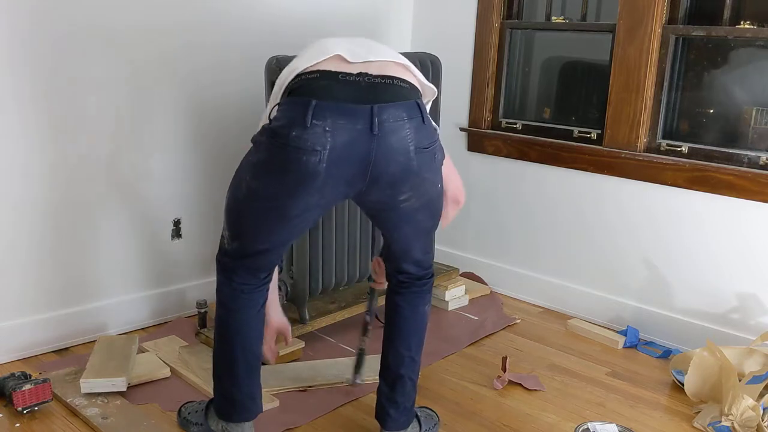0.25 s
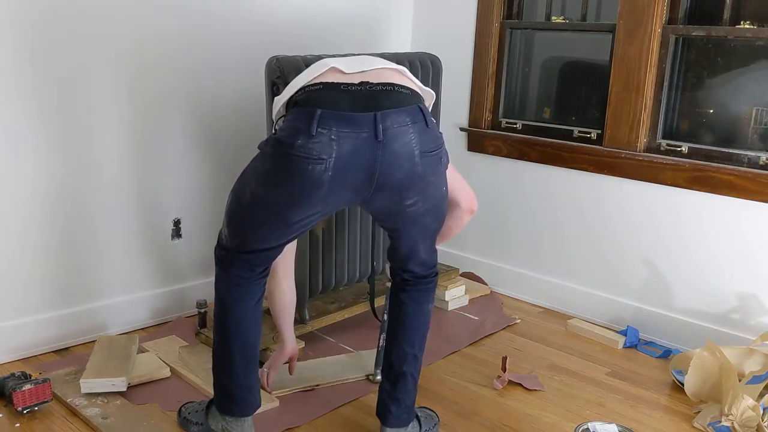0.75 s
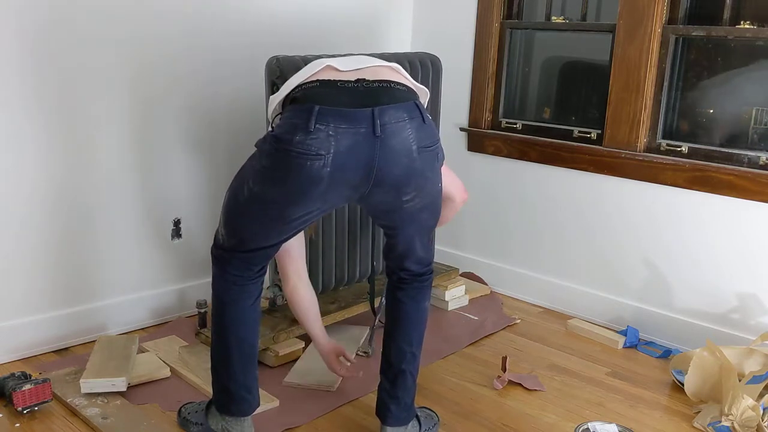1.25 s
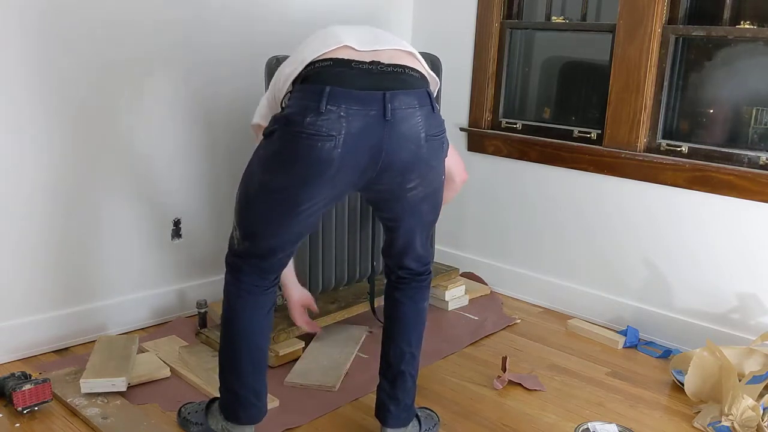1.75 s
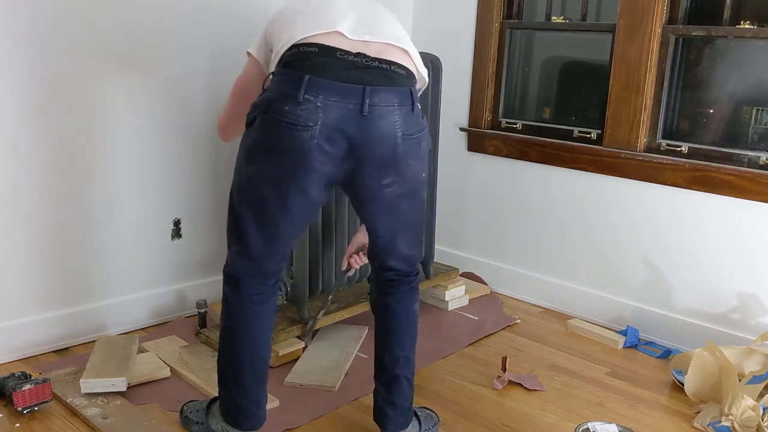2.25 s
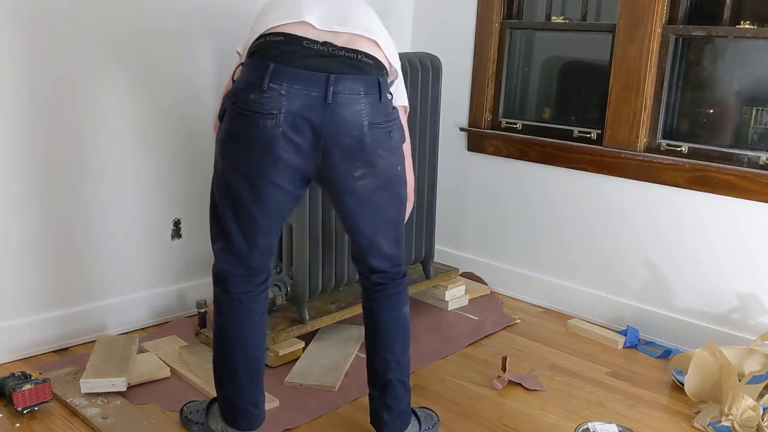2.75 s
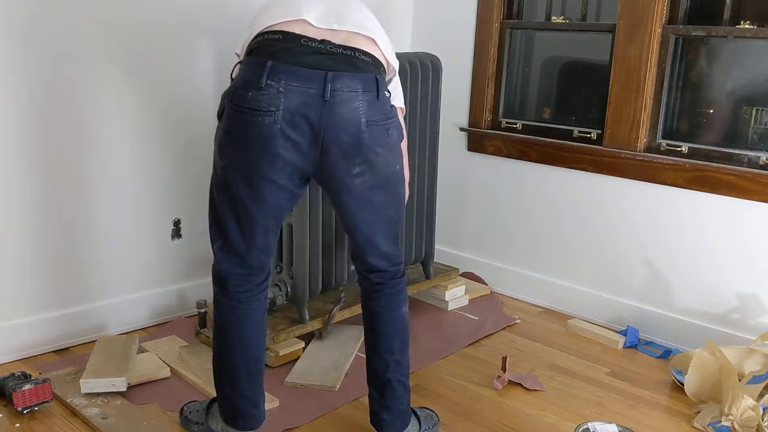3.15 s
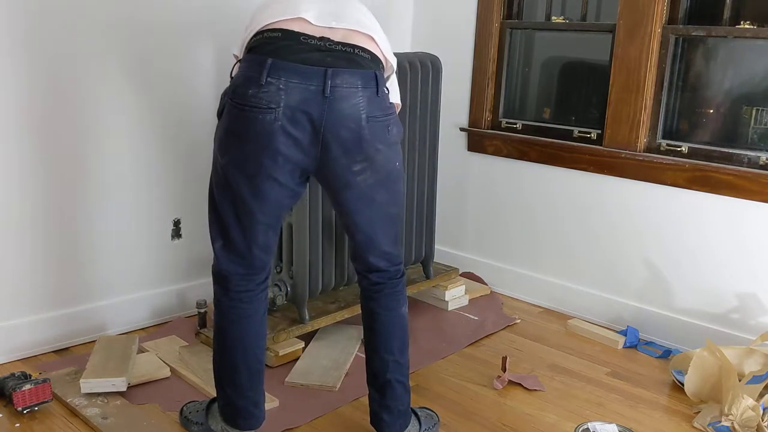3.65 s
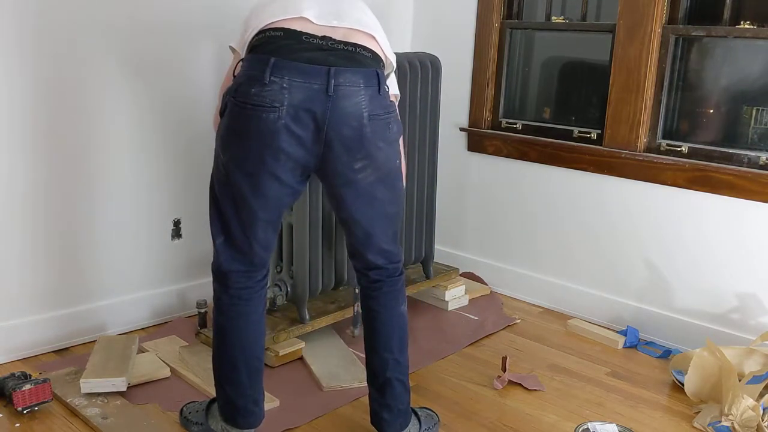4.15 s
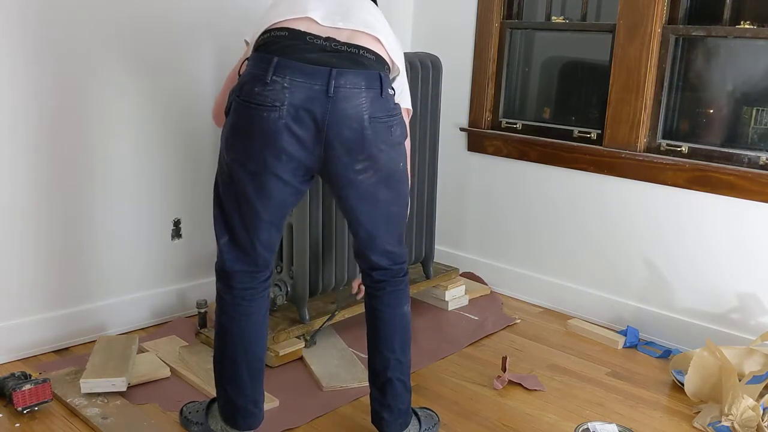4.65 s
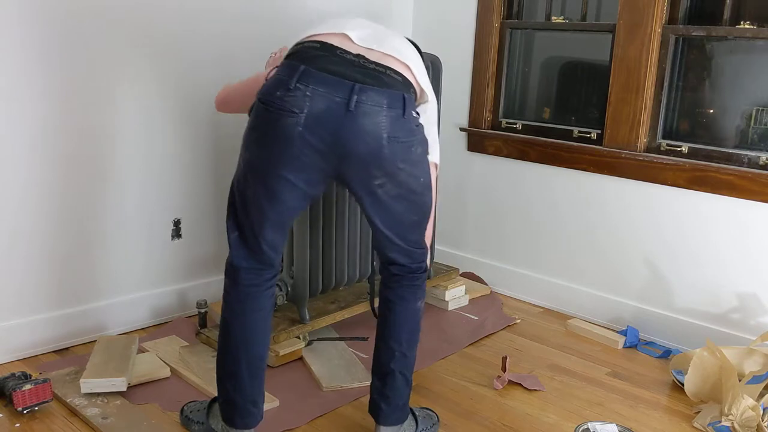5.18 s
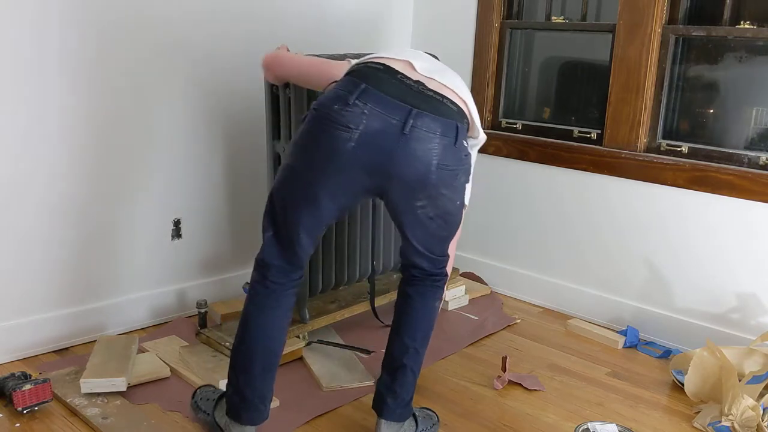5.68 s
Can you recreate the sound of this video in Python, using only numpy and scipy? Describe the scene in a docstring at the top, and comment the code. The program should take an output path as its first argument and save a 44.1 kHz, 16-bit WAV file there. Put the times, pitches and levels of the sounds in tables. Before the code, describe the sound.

In a small bare room, a tight burst of loud hollow wood knocks with a ringing steel clink and low floor boom opens the action. Boards hiss over papered floor, then more knocks cluster. After a pause come further clunks, gritty scraping, another bright slide and a short dry rip. The end is quieter with light scrapes. Stereo microphone at a few metres, work slightly right, faint hum beneath.

```python
"""Levering boards from under a radiator

Boards and blocks are levered out from under a cast-iron radiator with a steel pry bar, in a bare room.
Wood knocks ring through board resonances, joists boom as two beating modes, and the bar clinks as decaying
modes. Boards slide hissing and grinding over the papered floor as trains of tiny catches, and dry rips are
trains of cracks. Filtered noise and a low wavering hum lie beneath."""
import sys
import numpy as np
from scipy import signal
from scipy.fft import rfft, irfft, next_fast_len
from scipy.io import wavfile
from scipy.ndimage import map_coordinates

SR = 44100
rng = np.random.default_rng(int(sys.argv[2]) if len(sys.argv) > 2 else 0)


def file_out(sig):
    """Save sig as 16-bit WAV at sys.argv[1]."""
    # one column per channel
    cols = np.atleast_2d(sig).T
    # limit, then scale
    lim = np.clip(cols, -1, 1)
    pcm = np.round(lim * 32767).astype(np.int16)
    wavfile.write(sys.argv[1], SR, pcm)


N = 261072  # length [samples]
TIME = np.arange(N) / SR  # [s]
LIFE = np.arange(int(1.4 * SR)) / SR  # time since an event began [s]

# Still air of the room: frequency_hz, density_db (relative, per Hz)
AIR_SPECTRUM = [(20, -35), (32, -33), (48, -1.5), (80, 1.5), (110, -16.5), (200, -14.5), (330, -28),
                (520, -25), (1000, -29.5), (1800, -33.5), (2400, -29.5), (3500, -33), (8000, -41),
                (15800, -43.5)]
# Hum of a distant machine: frequency_hz, level_db (about which it wavers)
HUM_TONES = [(80.7, -68.5), (129.2, -71.5), (296, -73)]
# Boards pushed or dragged: top_speed_s, speeding_up_s, slowing_down_s, face_hiss_db, edge_grind_db
STROKES = [(.005, 0.011, 0.084, -62, -44), (.28, 0.21, .2, -66, -59), (.66, .05, 0.19, -45.5, -54),
           (.905, 0.13, 0.099, -29.5, -51), (1.16, 0.14, 0.12, -33, -46), (1.23, 0.089, 0.1, -32.5, -72),
           (1.37, 0.15, 0.23, -46.5, -58), (2.135, .07, 0.049, -60.5, -72),
           (2.785, 0.032, 0.087, -46.5, -33), (3.02, 0.041, 0.088, -47, -37),
           (3.155, 0.095, 0.073, -50, -42.5), (3.73, 0.043, 0.29, -48.5, -64),
           (3.919, .11, 0.14, -30.5, -62), (4.055, 0.069, 0.093, -32.5, -37), (4.72, .04, 0.22, -70, -45.5),
           (5.22, 0.42, 0.16, -62.5, -61), (5.645, 0.042, 0.11, -48.5, -48.5),
           (5.89, 0.041, 0.038, -40, -47)]
# Hiss of a board's face: frequency_hz, density_db (relative, per Hz)
HISS_SPECTRUM = [(100, -15), (300, -1), (450, -10.5), (800, -6), (1200, -2), (1900, -4.5), (2600, -0.5),
                 (4000, -1), (7000, -3), (10000, -4.5), (15800, -10.5)]
# Grind of a board's loaded edge: frequency_hz, density_db (relative, per Hz)
GRIND_SPECTRUM = [(80, 1), (250, 6.5), (600, -2), (1100, -2), (1700, -10.5), (2600, -11), (5000, -19),
                  (9000, -26.5), (15000, -49)]
# Wooden blows: start_s, body_db, body_hz, clack_db, clack_hz, splintery_tick_db, seating_s
KNOCKS = [(.475, -14, 240, -23.5, 1190, -44, 0.00077), (.518, -19, 215, -27, 640, -45, 0.009),
          (.581, -30.5, 342, -21, 1206, -34.5, 0.0049), (0.755, -46, 201, -41, 1190, -68, .002),
          (1.082, -19, 284, -26, 447, -61.5, 0.0056), (1.144, -22, 320, -20.5, 1160, -36, 0.0017),
          (1.218, -16.5, 226, -22.5, 695, -51.5, 0.001), (2.29, -22.5, 368, -27, 713, -53, 0.0058),
          (2.431, -25.5, 311, -22, 923, -67, 0.0031), (2.757, -41, 312, -42, 1050, -57, 0.0032),
          (2.779, -38, 287, -34, 910, -53, 0.0032), (2.964, -19.5, 254, -29.5, 320, -50.5, 0.0042),
          (3.253, -19.5, 283, -26, 710, -41, 0.0037), (3.322, -26, 480, -26.5, 880, -48.5, 0.00027),
          (3.729, -25, 258, -41, 660, -50.5, 0.0027), (3.764, -31, 172, -35, 1000, -65, 0.00095),
          (4.098, -22.5, 267, -25, 840, -69, 0.0043), (4.444, -90, 297, -56.5, 1840, -79, 0.0086),
          (4.695, -28.5, 301, -28.5, 607, -75, 0.002)]
# Resonances of the stacked boards: frequency_hz, width_hz, gain_db (relative to the direct path)
BOARD_MODES = [(115, 16, 8), (156, 28.5, 10), (220.4, 8.9, 5.5), (273.4, 46, 4.5), (380, 22, 4),
               (494, 91, 10.5), (611, 63, 5), (760, 18, -6), (734, 39, -1), (921, 69, 3.5), (1210, 12, -5),
               (1340, 62, 0.5), (1890, 48, 3.5), (2414, 155, 8.5), (2670, 330, 6)]
# Tick of splintering fibres: frequency_hz, gain_db
TICK_SPECTRUM = [(200, -65.5), (600, -24), (2000, 4.5), (4500, -8.5), (8000, -7.5), (15000, -16)]
# Blows on the pry bar: start_s, ring_db, clatter_db, contact_favoured_hz, extra_ping_db
CLINKS = [(0.479, -36.5, -32, 4000, 1), (.580, -25.5, -30, 3230, 4.5), (.755, -36, -56, 1380, 14),
          (2.294, -48, -51.5, 6000, -19), (2.429, -46, -33, 2130, -9), (3.254, -41, -43.5, 3430, -6),
          (3.321, -59, -41.5, 1730, -6), (4.098, -53, -42, 1730, -6), (4.699, -46, -43.5, 1900, 6)]
# Modes of the steel bar: frequency_hz, level_db (relative), t60_s
STEEL_MODES = [(1211, 2, .45), (1351, -2, .6), (1593, 3, .3), (1830, -5, .4), (2514, -9, .4),
               (2775, -7, .45), (3149, -16, .5), (3495, -10, .4), (3987, 0, .55), (4440, -15, .2),
               (5728, -10, .45)]
# Weight landing on the joists: start_s, level_db (before the floor's low cut)
THUDS = [(0.492, -18.5), (1.112, -27.5), (1.238, -24), (2.449, -29.5), (2.966, -27.5), (3.288, -38.5),
         (3.738, -29), (3.795, -39), (4.103, -28.5), (4.703, -33)]
# Something stuck tears free: start_s, level_db, tearing_t60_s
SNAPS = [(4.588, -33, 0.12), (5.409, -62.5, 0.016)]
# Resonances that a rip excites: frequency_hz, width_hz, gain_db
SNAP_MODES = [(686, 30, 4), (1020, 70, -2.5), (1350, 97, -2.5), (1540, 35, 3.5), (1900, 190, -2.5),
              (2500, 98, 5.5), (2880, 540, -4), (5650, 690, -2.5), (7030, 790, 1), (9100, 620, 0.5),
              (13500, 1200, -3.5)]
# Reverberation of the room: frequency_hz, t60_s
ROOM_DECAY = [(60, 0.6), (160, 0.33), (420, 0.5), (1100, 0.52), (3000, 0.45), (8000, 0.34), (15000, 0.17)]
# Likeness of the two channels in a diffuse field: frequency_hz, correlation
CHANNEL_CORRELATION = [(50, .97), (130, .68), (300, .48), (550, .65), (1000, .25), (2000, -.05), (15000, 0)]
# Balance of the whole scene: frequency_hz, left_minus_right_db
BALANCE = [(60, -3.8), (130, -3.6), (280, -2), (4000, -1.6), (8000, .8), (12500, -3.5)]


def amp(db):
    """The decibel law: level to amplitude gain."""
    return 10 ** (np.asarray(db) / 20)


def unit(x):
    """Normalization of power: scale to rms 1."""
    return x / np.sqrt(np.mean(x ** 2) + 1e-20)


def along(points, hz):
    """Interpolation of (frequency, value) points on a logarithmic axis."""
    frequencies, values = np.transpose(points)
    return np.interp(np.log(hz + 1), np.log(frequencies), values)


def wobble(rate_hz):
    """Slow random modulation: a smooth curve through rate_hz normal knots a second."""
    knots = rng.standard_normal(int(N * rate_hz / SR) + 4)
    return map_coordinates(knots, [TIME * rate_hz])


def filtered(x, response):
    """Linear filtering: a spectrum multiplied by a complex response of frequency."""
    n = x.shape[-1]
    padded = next_fast_len(n + 8192)
    hz = np.fft.rfftfreq(padded, 1 / SR)
    return irfft(rfft(x, padded) * response(hz), padded)[..., :n]


def coloured(x, spectrum):
    """Spectral shaping: a gain in dB that varies with frequency."""
    return filtered(x, lambda hz: amp(along(spectrum, hz)))


def resonance(f, centre_hz, width_hz):
    """Damped oscillator: one causal resonance with peak gain 1."""
    return 1j * f * width_hz / (centre_hz ** 2 - f * f + 1j * f * width_hz)


def diffuse(x):
    """Spatial coherence: mixing two unrelated signals into a pair that is alike in the bass."""
    def mid_side_gains(hz):
        angle = np.arccos(np.clip(along(CHANNEL_CORRELATION, hz), -1, 1)) / 2
        return np.array([np.cos(angle), np.sin(angle)])

    mid, side = filtered(x, mid_side_gains)
    return np.array([mid + side, mid - side])


def room(early_db, rise_s=0.0017, late_db=-24, late_t60_s=2.16):
    """Reverberation: a fresh path with an early cluster, dense wall echoes and a faint lingering tail."""
    hz, t, cells = signal.stft(rng.standard_normal((2, len(LIFE))), SR, nperseg=256)
    t60 = along(ROOM_DECAY, hz)[:, None]
    main_decay = amp(-60 * t / t60)
    late_decay = amp(late_db - 60 * t / late_t60_s) * (t60 / t60.max()) ** 2
    echoes = signal.istft(cells * (main_decay + late_decay), SR, nperseg=256)[1]
    path = diffuse(echoes[:, :len(LIFE)])
    # the corner's walls and floor throw back a strong first cluster
    early_boost = 1 + amp(early_db) * np.exp(-LIFE / 0.0042)
    path *= early_boost * (1 - np.exp(-LIFE / rise_s))
    return path / np.linalg.norm(path, axis=1, keepdims=True)


def blow(x, db):
    """Level of a transient: its rms over the first 60 ms is set to db."""
    head = x[..., :int(.06 * SR)]
    return amp(db) * x / np.sqrt(np.mean(head ** 2) + 1e-20)


def add(track, start_s, x):
    """Superposition: x is summed into the track from start_s."""
    part = track[:, max(round(start_s * SR), 0):][:, :x.shape[-1]]
    part += x[..., :part.shape[1]]


def room_tone(air_db=-54):
    """Stationary background: diffuse coloured noise plus tones wavering in level and phase."""
    air = amp(air_db) * unit(coloured(diffuse(rng.standard_normal((2, N))), AIR_SPECTRUM))
    hum = 0
    for hz, db in HUM_TONES:
        level = amp(db + 7.3 * wobble(2.56))
        hum = hum + level * np.sqrt(2) * np.sin(2 * np.pi * hz * TIME + .5 * wobble(3.9))
    return air + hum


def pushes(ramp_db=22.5, turn_share=0.25, resting_hiss_db=-69, resting_grind_db=-72.5):
    """Addition of powers: strokes swell and fade steadily in dB, rounded at top speed, to drive hiss and grind."""
    # the loaded stack never lies quite still
    hiss_power = np.full(N, amp(resting_hiss_db) ** 2)
    grind_power = np.full(N, amp(resting_grind_db) ** 2)
    for top_s, rise_s, fall_s, hiss_db, grind_db in STROKES:
        ramps_away = (TIME - top_s) / np.where(TIME < top_s, rise_s, fall_s)
        # the turn at top speed is rounded over turn_share of a ramp
        rounded = np.hypot(ramps_away, turn_share) - turn_share
        push = amp(-ramp_db * np.minimum(rounded, 10))
        hiss_power = hiss_power + (amp(hiss_db) * push) ** 2
        grind_power = grind_power + (amp(grind_db) * push) ** 2
    return np.sqrt(hiss_power), np.sqrt(grind_power)


def friction(gain, spectrum, catches_per_s, uneven_db, echo_db):
    """Stick-slip friction: tiny catches of the grain under an uneven push, scattered and echoed by the room."""
    caught = rng.random((2, N)) < catches_per_s / SR
    grains = rng.standard_normal((2, N)) * caught
    stroke = unit(coloured(diffuse(grains), spectrum)) * gain * amp(uneven_db * wobble(35))
    echo = signal.fftconvolve(stroke, room(early_db=-17), axes=1)[:, :N]
    return (stroke + amp(echo_db) * echo) / np.hypot(1, amp(echo_db))


def knocks(body_q=1.11, clack_q=1.37, chatter_db=-26, chatter_t60_s=0.076, own_q=36):
    """Impact excitation of modes: a board's body, a harder clack where faces meet, and a tick of fibres."""
    def stack(f):
        return 1 + sum(amp(db) * resonance(f, hz, width) for hz, width, db in BOARD_MODES)

    out = np.zeros((2, N))
    t = LIFE[:SR // 10]
    for start_s, body_db, body_hz, clack_db, clack_hz, tick_db, seating_s in KNOCKS:
        # uneven faces chatter briefly before they lie flat
        chatter = rng.standard_normal(len(t)) * (rng.random(len(t)) < .1)
        force = amp(chatter_db - 60 * t / chatter_t60_s) * chatter
        force[0] = 1
        contact = signal.fftconvolve(room(early_db=0.5, rise_s=seating_s), force[None], axes=1)
        # every offcut adds a few bending modes of its own to those of the stack
        own_hz = np.geomspace(600, 4500, 9) * np.exp(.1 * rng.standard_normal(9))
        wood = filtered(contact, lambda f: stack(f) + 2 * sum(resonance(f, hz, hz / own_q) for hz in own_hz))
        body = filtered(wood, lambda f: resonance(f, body_hz, body_hz / body_q) ** 2)
        clack = filtered(wood, lambda f: resonance(f, clack_hz, clack_hz / clack_q) ** 2)
        tick = coloured(contact, TICK_SPECTRUM)
        add(out, start_s, blow(body, body_db) + blow(clack, clack_db) + blow(tick, tick_db))
    return out


def clinks(focus_db_per_octave=14, smear_hz=70, clatter_q=1.57, ping_hz=3987):
    """Modal ringing: the bar's tip clatters and its modes decay, fluttering under crossing wall echoes."""
    out = np.zeros((2, N))
    for start_s, ring_db, clatter_db, favoured_hz, ping_db in CLINKS:
        ring = 0
        for hz, mode_db, t60_s in STEEL_MODES:
            noise = rng.standard_normal((2, len(LIFE)))
            echoes = unit(filtered(noise, lambda f: resonance(f, hz, smear_hz) ** 2))
            tone = np.sin(2 * np.pi * (hz * LIFE + rng.random((2, 1)))) + .5 * echoes
            # modes far from the contact point's favoured frequency are excited less
            focus_loss_db = focus_db_per_octave * abs(np.log2(hz / favoured_hz))
            level_db = mode_db + ping_db * (hz == ping_hz) - focus_loss_db
            ring = ring + blow(tone * amp(-60 * LIFE / t60_s), level_db)
        ring = ring * (1 - np.exp(-LIFE / 0.00078))
        clatter = filtered(room(early_db=3, rise_s=0.0025),
                           lambda f: resonance(f, favoured_hz, favoured_hz / clatter_q) ** 2)
        add(out, start_s, blow(ring, ring_db) + blow(clatter, clatter_db))
    return out


def thuds(low_hz=51, high_hz=60.66, low_share=0.88, rise_s=0.01, t60_s=0.45):
    """Beating: two close modes of the joists swell, then interfere as they die."""
    out = np.zeros((2, N))
    for start_s, db in THUDS:
        detune = 1 + .02 * rng.standard_normal(2)  # each landing shifts both modes slightly
        low = low_share * np.sin(2 * np.pi * low_hz * detune[0] * LIFE)
        high = np.sin(2 * np.pi * high_hz * detune[1] * LIFE)
        envelope = (1 - np.exp(-LIFE / rise_s)) ** 2 * amp(-60 * LIFE / t60_s)
        add(out, start_s, blow((low + high) * envelope, db))
    return coloured(out, [(28, -7), (44, -1.0)])  # the floor radiates little below its modes


def snaps(cracks_per_s=900):
    """Fracture as an impulse train: a bright crack runs on in smaller ones, with no weight behind it."""
    def ringing(f):
        total = 0
        for k, (hz, width_hz, db) in enumerate(SNAP_MODES):
            total = total + (-1) ** k * amp(db) * resonance(f, hz, width_hz)  # alternating polarity
        return total

    out = np.zeros((2, N))
    t = LIFE[:SR // 4]
    for start_s, db, t60_s in SNAPS:
        cracks = rng.standard_normal(len(t)) * (rng.random(len(t)) < cracks_per_s / SR)
        train = amp(-3 - 60 * t / t60_s) * cracks
        train[0] = 1
        rip = signal.fftconvolve(room(early_db=-18), train[None], axes=1)
        bright = coloured(filtered(rip, ringing), [(350, -18), (650, 0)])
        add(out, start_s, blow(bright, db))
    return out


def scene():
    """Superposition of all sources, with a level difference that sets the work mostly a little to the right."""
    hiss_gain, grind_gain = pushes()
    slide = friction(hiss_gain, HISS_SPECTRUM, catches_per_s=12000, uneven_db=2.47, echo_db=-1)
    grind = friction(grind_gain, GRIND_SPECTRUM, catches_per_s=3000, uneven_db=0.5, echo_db=-1.0)
    mix = room_tone() + slide + grind + knocks() + clinks() + thuds() + snaps()
    # half the balance goes to each side, with opposite sign
    return filtered(mix, lambda hz: amp(np.outer([.5, -.5], along(BALANCE, hz))))


def record(dry, ceiling=.93, top_hz=15950):
    """Soft saturation and band limiting: the tallest peaks are rounded, then all above top_hz is removed."""
    rounded = dry / (1 + np.abs(dry / ceiling) ** 8) ** (1 / 8)
    return filtered(rounded, lambda hz: hz < top_hz)


dry = scene()
out = record(dry)
file_out(out)
```